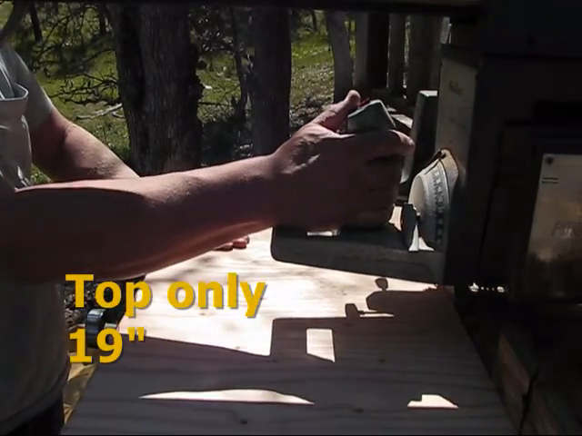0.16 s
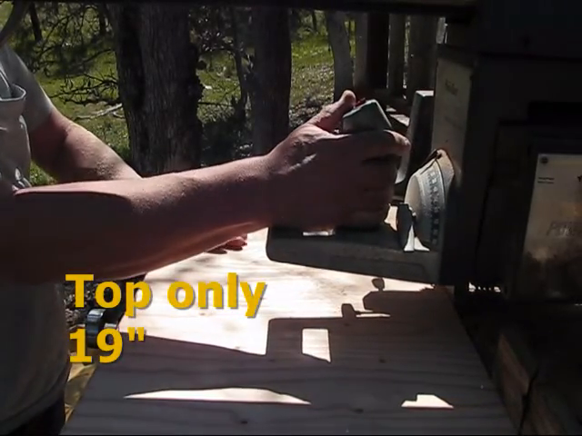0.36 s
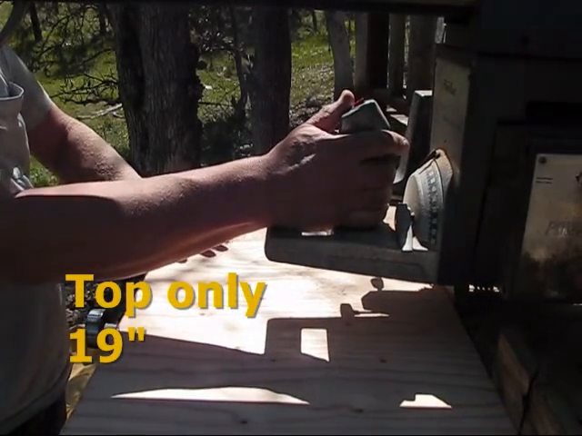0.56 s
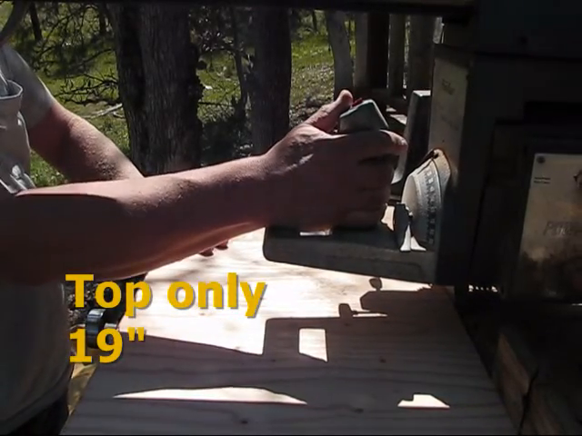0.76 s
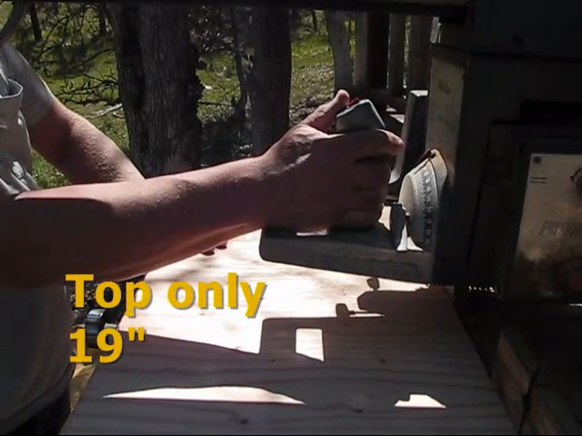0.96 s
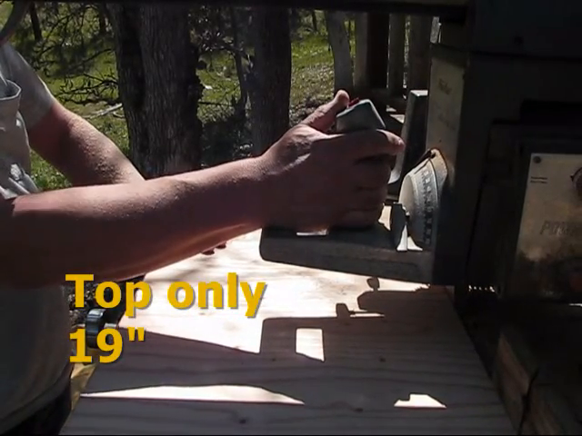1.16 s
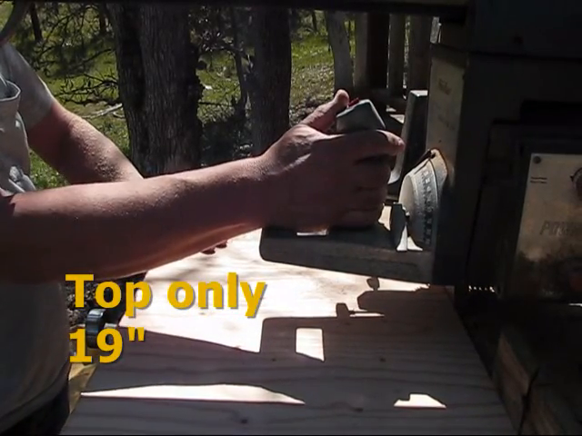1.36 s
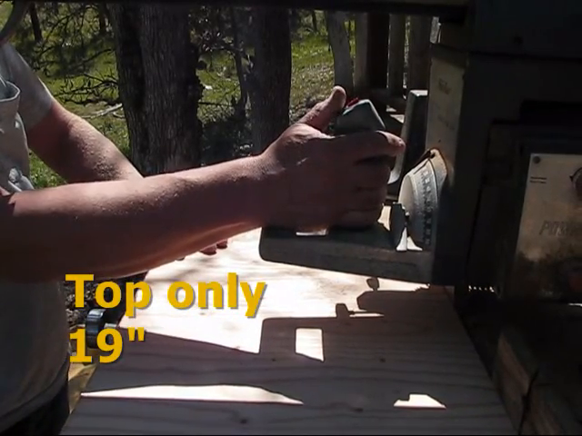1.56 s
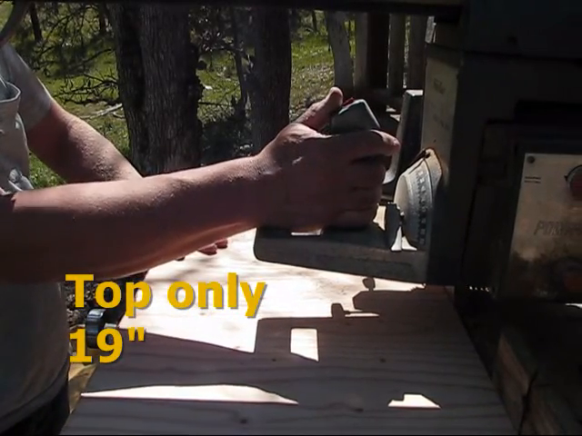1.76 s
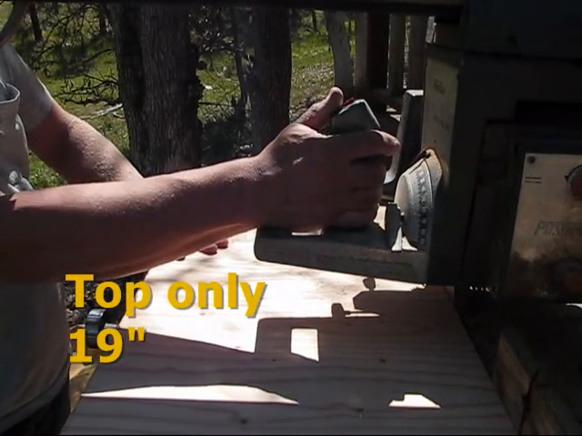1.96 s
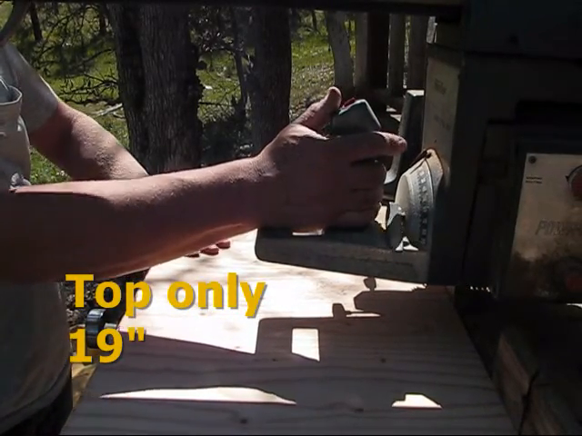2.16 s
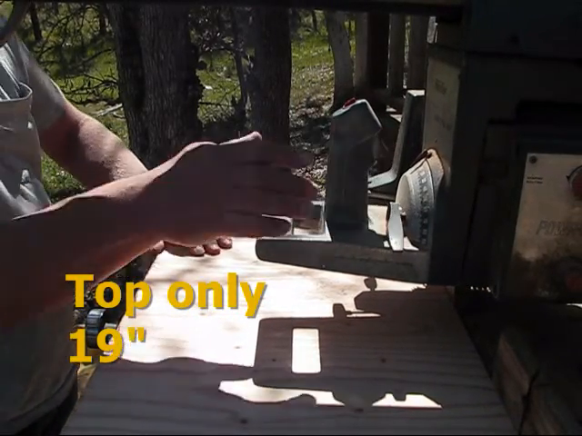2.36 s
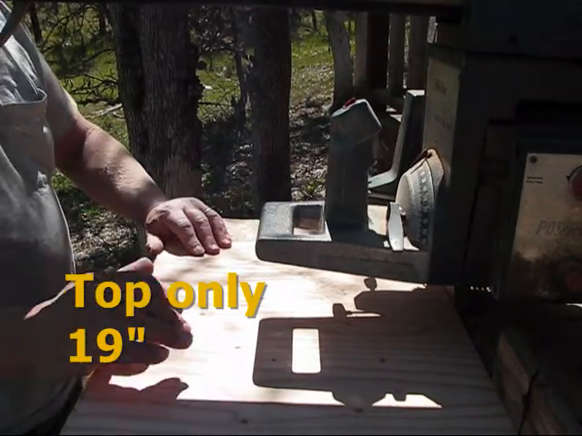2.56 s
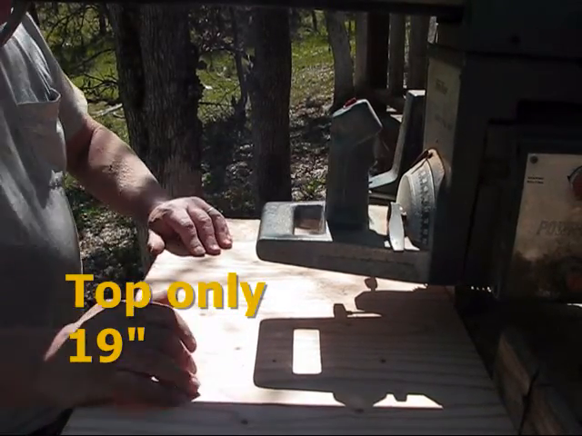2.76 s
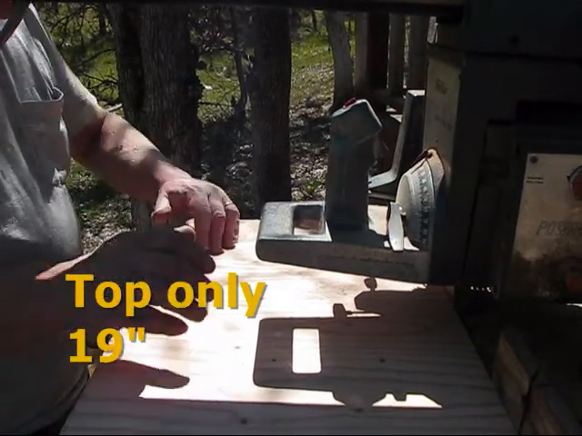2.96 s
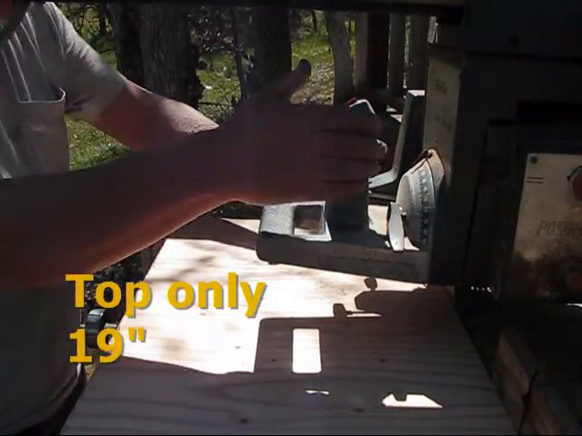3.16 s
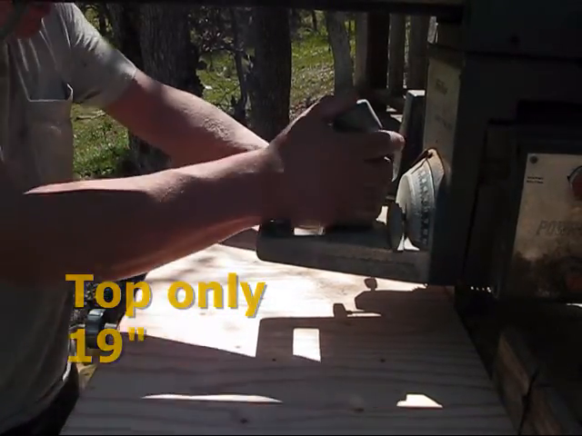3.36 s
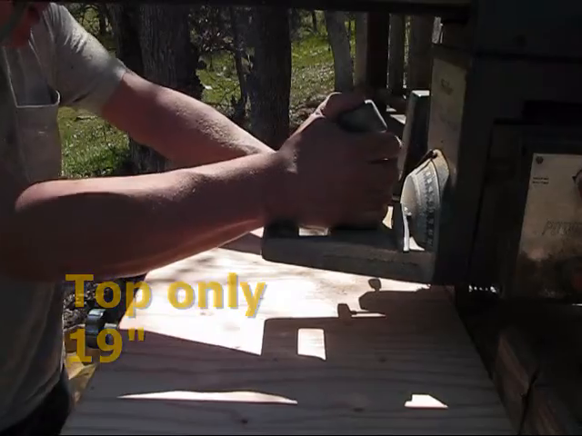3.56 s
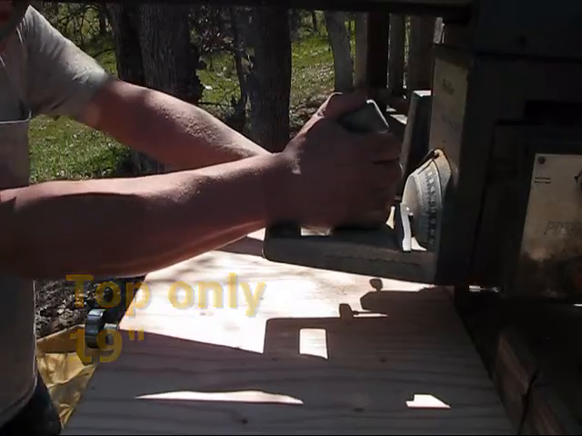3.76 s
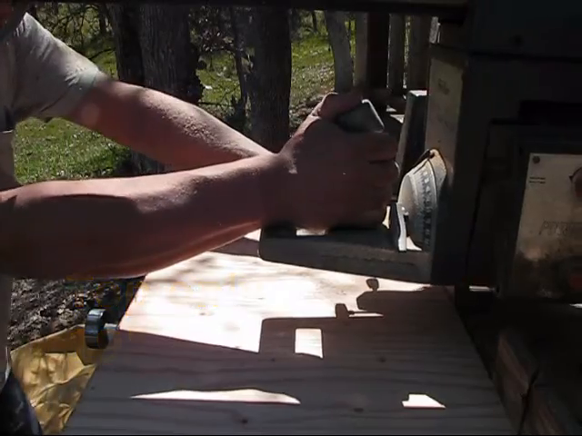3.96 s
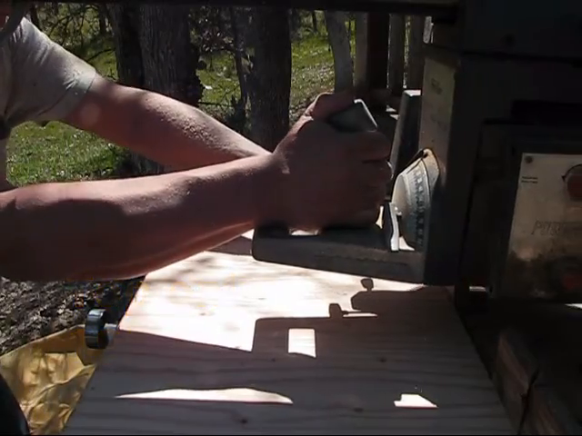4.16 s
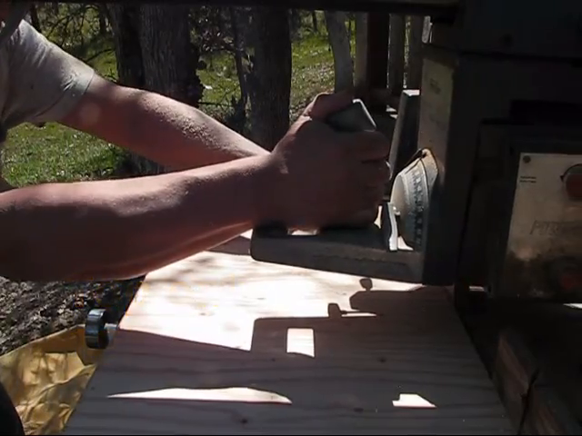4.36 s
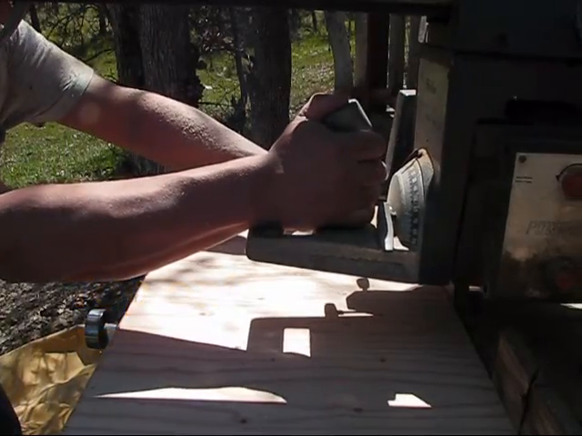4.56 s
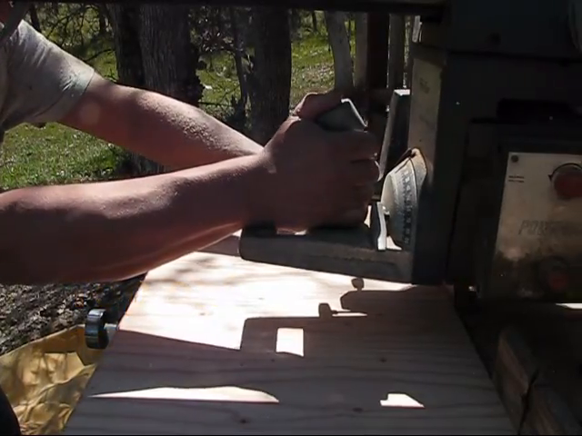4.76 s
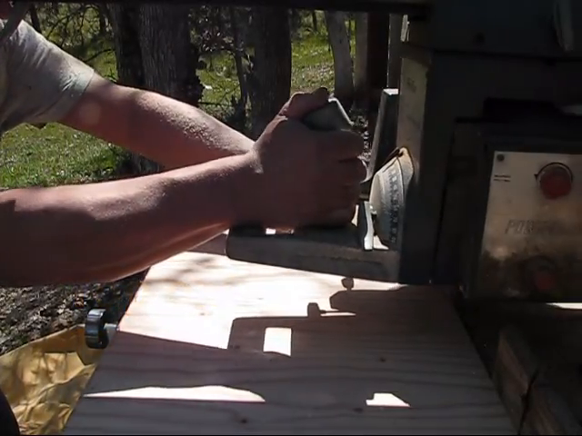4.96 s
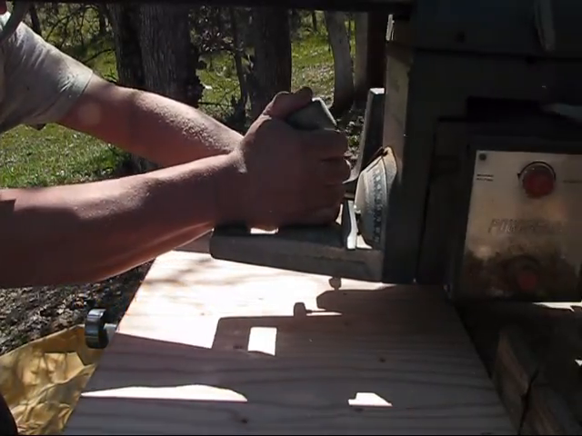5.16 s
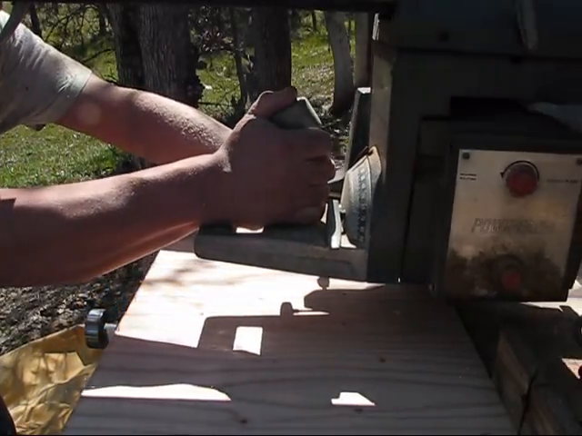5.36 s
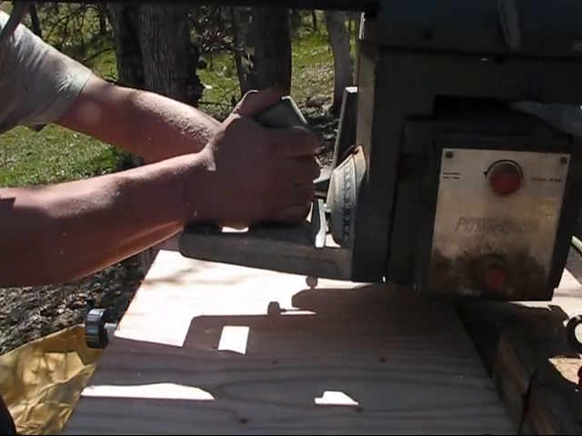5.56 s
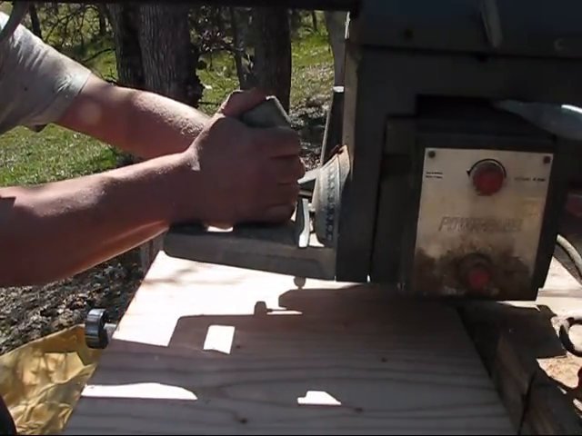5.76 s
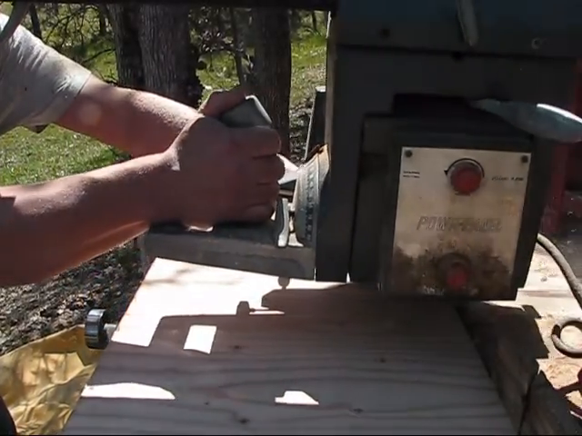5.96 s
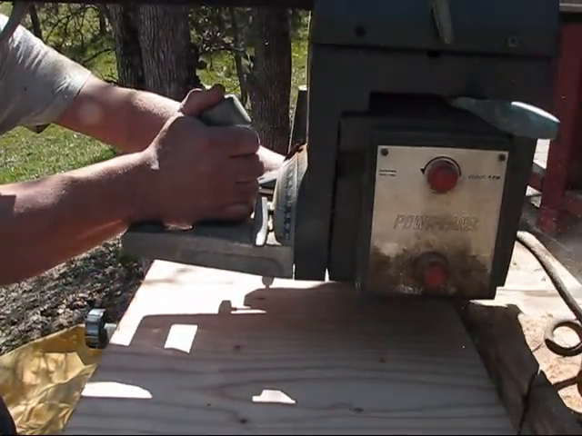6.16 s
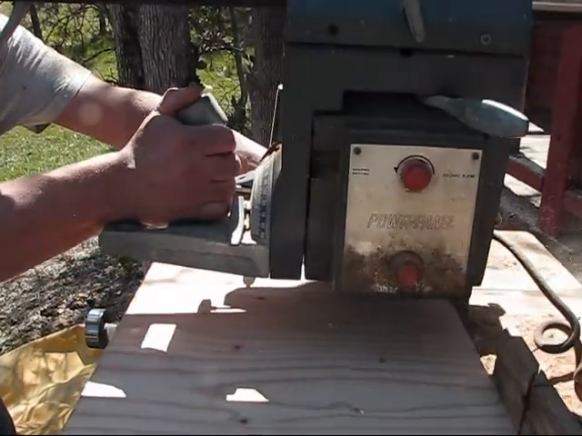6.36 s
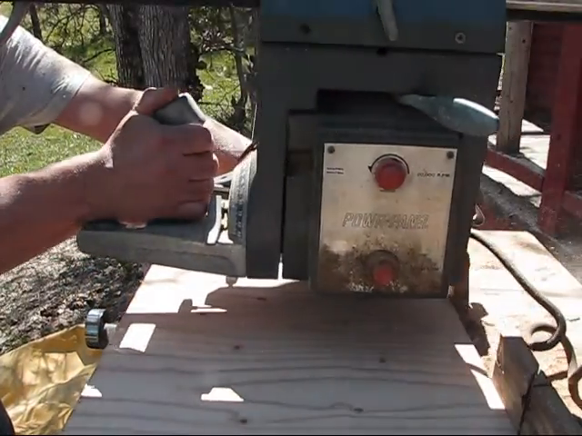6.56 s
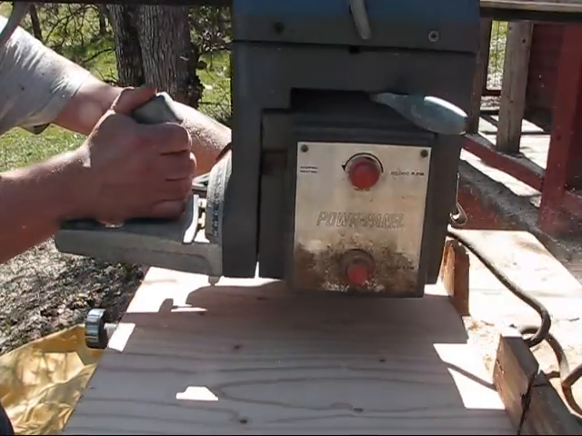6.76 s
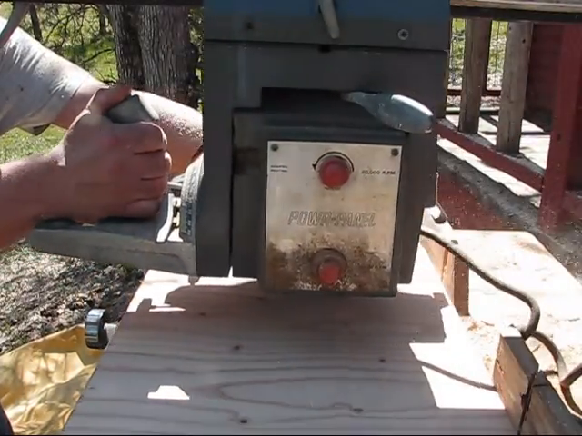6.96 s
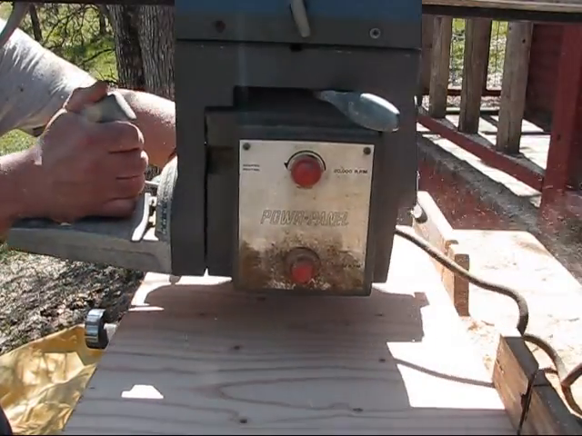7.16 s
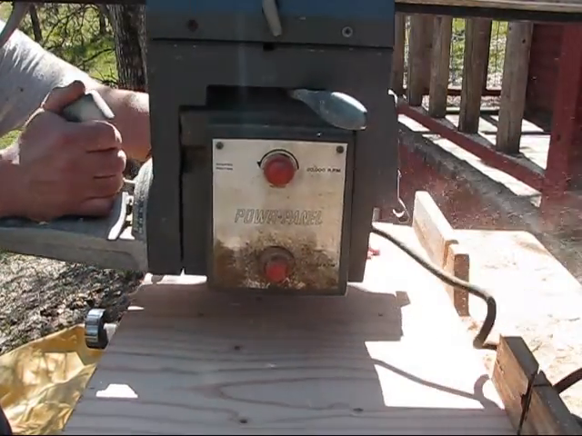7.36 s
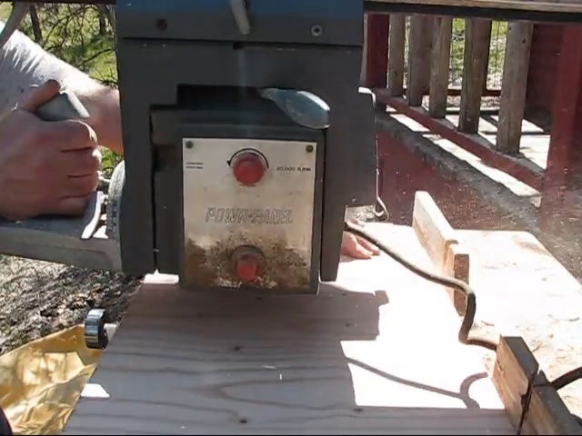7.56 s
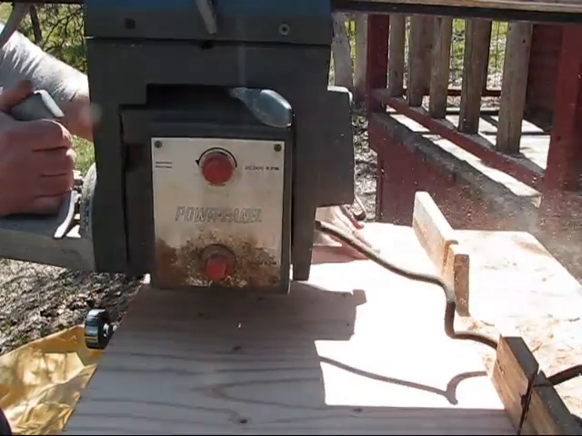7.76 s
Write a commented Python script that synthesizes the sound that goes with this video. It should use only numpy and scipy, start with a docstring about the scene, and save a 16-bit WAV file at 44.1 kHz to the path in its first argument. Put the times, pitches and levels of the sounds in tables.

```python
"""A radial arm saw on an outdoor deck spins up and is pulled through a board, slowing a little under load.
First the carriage rolls and squeaks, hands and board rub and knock on the table, and the switch snaps.
The motor then forces its housing and frame into vibration, and air rushes through the guard.
Twenty teeth chop the air into a harmonic series whose partials flare as they sweep through resonances;
the steel plate rings in its own modes, more strongly as it sinks into the wood."""
import sys
import numpy as np
from scipy import signal
from scipy.fft import rfft, irfft
from scipy.io import wavfile

SR = 44100
rng = np.random.default_rng(int(sys.argv[2]) if len(sys.argv) > 2 else 0)


def digitize_waveform(pressure):
    """Quantize a signal to 16-bit integers and store it at the path in sys.argv[1].

    Rows of a 2-D input are taken as channels; values are limited to [-1, 1].
    """
    field = np.atleast_2d(pressure).T
    bounded = np.clip(field, -1, 1)
    quanta = np.round(bounded * 32767).astype(np.int16)
    wavfile.write(sys.argv[1], SR, quanta)


N = 348390
T = np.arange(N) / SR
HZ = np.maximum(np.fft.rfftfreq(N, 1 / SR), 1)
SWITCH_ON_S = 3.8218
TEETH, FREE_TOOTH_HZ = 20, 942   # tooth count; tooth-passing frequency without load
PANEL_RADIATION = 1 / (1 + (500 / HZ) ** 2)   # small panels radiate little bass


def from_db(db):
    """Amplitude ratio of a level in decibels."""
    return 10 ** (np.asarray(db) / 20)


def unit_power(x):
    """Normalisation to a mean square of one."""
    return x / np.sqrt(np.mean(x ** 2) + 1e-20)


def over_time(points):
    """Linear interpolation of a curve at every sample."""
    return np.interp(T, *np.transpose(points))


def over_hz(points):
    """Interpolation on a logarithmic frequency axis."""
    hz, value = np.transpose(points)
    return np.interp(np.log(HZ), np.log(hz), value)


def colour(points):
    """Spectral envelope, falling 12 dB an octave below its lowest point."""
    return from_db(over_hz(points)) * np.minimum(HZ / points[0][0], 1) ** 2


def resonances(modes, at=HZ):
    """Frequency response of damped resonators, summed in power."""
    return np.sqrt(sum(from_db(db) ** 2 / (1 + ((at ** 2 - hz ** 2) / (at * width)) ** 2)
                       for hz, width, db in modes))


def swells(events):
    """Summed envelopes of exponential growth to a peak and exponential decay."""
    return sum(from_db(db) * np.exp(-np.maximum((peak - T) / swell, (T - peak) / decay).clip(max=40))
               for peak, db, swell, decay in events)


def burst(start_s, attack_s, hold_s, decay_s):
    """Envelope with a linear attack; exponential decay begins hold_s after the start."""
    age = T - start_s
    return np.clip(age / attack_s, 0, 1) * np.exp(-np.clip((age - hold_s) / decay_s, 0, 40))


def drift(rate_hz):
    """Random modulation: low-passed noise of unit spread."""
    step, settle = 40, 2000
    pole = np.exp(-2 * np.pi * rate_hz * step / SR)
    white = rng.standard_normal(N // step + settle + 2)
    slow = signal.lfilter([1], [1, -2 * pole, pole * pole], white)[settle:]
    return np.interp(np.arange(N) / step, np.arange(len(slow)), unit_power(slow))


def pan(left_db):
    """Channel gains for an interaural level difference."""
    return from_db(np.array([[left_db], [-left_db]]) / 2)


def tone(cycles, flutter_db, wobble_rad, apart_rad, rate_hz=22):
    """A unit-power partial: turbulence modulates level and phase, reflections set the sides apart."""
    phase = 2 * np.pi * cycles + wobble_rad * drift(rate_hz)
    level = unit_power(from_db(flutter_db * (drift(1.7) + drift(rate_hz)) / 2))
    spread = apart_rad * drift(0.66) * np.array([[1], [-1]])
    return np.sqrt(2) * level * np.sin(phase + spread)


# Likeness of the sound field at left and right: frequency_hz, correlation
COHERENCE = [(40, 0.26), (150, 0.47), (300, 0.74), (600, 0.92), (1200, 0.76), (2500, 0.69), (5000, 0.49),
             (9000, 0.15), (14000, 0.87)]
def noise(gain):
    """Partially coherent stereo noise of unit power, shaped by a gain per frequency."""
    mid, side = rfft(rng.standard_normal((2, N)))
    alike = over_hz(COHERENCE)
    spectrum = np.sqrt(1 + alike) * mid + np.sqrt(1 - alike) * side * [[1], [-1]]
    return unit_power(irfft(gain * spectrum, N))


# Spectrum of distant rustle: frequency_hz, gain_db
RUSTLE_SPECTRUM = [(76, -48), (130, -1.5), (427, -3), (565, -0.5), (651, 0), (994, 1), (1120, -1.5),
                   (1610, -5.5), (2610, -14.5), (7150, -19), (8070, -18), (15100, -24), (16000, -33)]
# Narrow bands of a faint hum: pitch_hz, width_hz, gain_db
HUM_BANDS = [(99.2, 2.6, -1.5), (286.7, 3, -9.5), (600, 2.9, -10), (7800, 30, -28)]
# Spectrum of low rumble: frequency_hz, gain_db
RUMBLE_SPECTRUM = [(12, -35), (20, -3), (96, -2), (124, -4), (154, 1), (182, -25), (200, -14), (260, -44),
                   (440, -120)]
# Soft bumps in the rumble: peak_s, level_db, swell_s, decay_s
LOW_BUMPS = [(.68, -52, 0.093, .12), (1.98, -46, .02, 0.028), (2.38, -45, 0.055, 0.04),
             (2.93, -43, 0.038, 0.038), (3.6, -53, 0.033, .25)]
def outdoors():
    """The ambient noise floor of rustle, hum and rumble, faded out as the saw starts."""
    rustle = from_db(-49.5) * noise(colour(RUSTLE_SPECTRUM))
    hum = from_db(np.interp(T, [1.6, 2.1], [-64, -56])) * noise(resonances(HUM_BANDS))
    rumble = (from_db(-60) + swells(LOW_BUMPS)) * noise(colour(RUMBLE_SPECTRUM) / (1 + (HZ / 160) ** 4))
    return (rustle + hum + rumble) * np.exp(-np.maximum(T - SWITCH_ON_S, 0) / 0.067)


# Runs of the carriage on its track: peak_s, level_db, swell_s, decay_s
CARRIAGE_RUNS = [(.12, -32.5, 1.4, 0.095), (.36, -48, 0.067, 0.078), (1.03, -46.5, 0.31, 0.15),
                 (1.86, -41.5, 0.085, 0.042), (3.71, -39, 0.069, 0.073)]
# Spectrum of the vibrating carriage: frequency_hz, gain_db
CARRIAGE_SPECTRUM = [(88, -57), (150, -25), (297, -13), (368, -6.5), (578, -7.5), (805, 0.5), (979, -0.5),
                     (1060, 2.5), (1290, -6), (1530, -0.5), (1940, -11), (2220, -9), (4000, -17.5),
                     (9440, -16.5), (16000, -30)]
# Strokes of hands and board over the table: start_s, length_s, level_db
SLIDE_STROKES = [(0, 0.16, -30.5), (0.187, 0.21, -44.5), (0.457, 0.68, -58), (0.896, 0.2, -52),
                 (1.736, 0.15, -47.5), (2.126, 0.15, -43), (2.322, 0.11, -43), (2.496, .04, -53.5),
                 (2.743, 0.087, -49), (2.882, .03, -49), (3.015, .14, -46.5), (3.295, 0.076, -42),
                 (3.42, .08, -40), (3.594, 0.16, -40.5)]
# Spectrum of friction on wood: frequency_hz, gain_db
FRICTION_SPECTRUM = [(710, -42), (1200, -5), (1460, 1), (2000, -4), (2380, -3.5), (2620, 0), (10000, -4.5),
                     (13000, -4.5), (16000, -36)]
# Light knocks and scuffs of the board: peak_s, level_db, swell_s, decay_s
BOARD_KNOCKS = [(.502, -47, 0.0081, .012), (.8, -45.5, 0.017, 0.021), (1.196, -32.5, 0.00072, 0.0027),
                (1.239, -36, .0009, 0.0036), (2.825, -41, 0.0079, 0.0069), (3.024, -35.5, 0.0058, 0.014),
                (3.055, -39, 0.0046, 0.01), (3.093, -34.5, 0.0035, 0.0056), (3.156, -29.5, 0.011, 0.0062),
                (3.365, -27.5, 0.0012, 0.01), (3.384, -45, .003, 0.0037), (3.44, -37, 0.018, 0.026),
                (3.696, -44, 0.0035, .01), (3.708, -23, 0.00062, 0.003)]
# Modes of the saw table: pitch_hz, width_hz, gain_db
TABLE_MODES = [(290, 60, 4), (900, 470, -17), (1450, 300, 4), (2400, 1100, 3.5), (4370, 2200, 8.5),
               (9600, 4200, 1)]
def handling(shake_db=-14):
    """Contact noise: the carriage rolls, wood rubs, and impacts excite both table and carriage."""
    blows = swells(BOARD_KNOCKS)
    strokes = sum(from_db(db) * burst(start, 0.021, length, 0.025) for start, length, db in SLIDE_STROKES)
    carriage_drive = from_db(5) * swells(CARRIAGE_RUNS) + from_db(shake_db) * blows
    roll = carriage_drive * noise(colour(CARRIAGE_SPECTRUM) / np.sqrt(1 + (HZ / 10000) ** 2))
    slide = strokes * from_db(-3.5 + 2.2 * drift(90)) * noise(colour(FRICTION_SPECTRUM))
    knocks = blows * noise(resonances(TABLE_MODES))
    return (roll + slide + knocks) * (T < SWITCH_ON_S) * pan(-2.1)


# Thin rings of small metal parts, and at 1.88 s a faint ring of the idle blade: start_s, pitch_hz, level_db,
# decay_s
METAL_SQUEAKS = [(1.0, 4264, -55, 0.13), (1.1, 2040, -46, 0.03), (1.88, 4300, -55, 0.16),
                 (1.88, 2830, -63, .14), (3.283, 1770, -43, 0.0081), (3.312, 2400, -43, 0.02),
                 (3.42, 1440, -38, 0.012)]
def squeaks():
    """Damped free vibration of parts of the carriage and its handle, and of the idle blade."""
    return sum(from_db(db) * burst(start, 0.0028, 0, decay)
               * tone(hz * T, flutter_db=2, wobble_rad=0.63, apart_rad=0.31)
               for start, hz, db, decay in METAL_SQUEAKS)


# Spectrum of the switch's snap: frequency_hz, gain_db
SNAP_SPECTRUM = [(120, -56), (200, -23), (1420, -5), (3620, -11.5), (4270, -1.5), (5840, -10), (7970, -3),
                 (11100, -13), (13600, -18), (16000, -27)]
def switch(trip_db=-13, contact_db=-5.5, travel_s=0.00075, hold_s=0.0038, decay_s=0.003):
    """A brief impact has a broad spectrum: the switch trips, then its contacts slam shut."""
    age = T - SWITCH_ON_S
    level = (age > 0) * from_db(np.where(age < travel_s, trip_db, contact_db))
    fading = np.exp(-np.clip((age - travel_s - hold_s) / decay_s, 0, 40))
    return level * fading * noise(colour(SNAP_SPECTRUM))


# Modes of the motor housing: pitch_hz, width_hz, gain_db
HOUSING_MODES = [(1040, 25, -2.5), (1309, 28, 0), (1576, 33, 0.5), (1940, 380, -6.5), (2460, 110, -10.5),
                 (2820, 59, 3), (3284, 330, -7), (4080, 78, -1.5), (5340, 150, -7.5)]
def housing_rattle(turns, strain, depth):
    """Forced vibration: the straining motor shakes its housing, pulsing with the mains and each turn."""
    level = from_db(-21.5 + 3.5 * strain + 4.5 * depth + 1.55 * drift(50)) * np.sqrt(strain)
    mains = np.sin(2 * np.pi * 120 * T)
    pulsing = 1 + 0.057 * mains + 0.11 * np.sin(2 * np.pi * turns)
    return level * pulsing * noise(resonances(HOUSING_MODES) * PANEL_RADIATION) * pan(-2.5)


# Spectrum of air driven by the motor: frequency_hz, gain_db
AIR_SPECTRUM = [(60, -28), (150, -15.5), (300, -7.5), (500, -5), (800, -0.5), (1200, 3), (2200, 0),
                (3200, 2), (5000, -4), (9000, -44), (16000, -35)]
# Resonances of the blade guard: pitch_hz, width_hz, gain_db
GUARD_MODES = [(630, 30, -28), (987.4, 8.9, 1.5), (1153, 14, -13), (1352, 2.2, -2)]
# Course of the guard's hollow howl: time_s, level_db
HOWL_LEVELS = [(3.85, -37), (4.8, -38), (5.2, -26.5), (5.6, -35), (5.85, -31.5), (6.9, -27), (7.33, -18),
               (7.55, -28.5), (7.9, -27)]
def airflow(strain, depth):
    """Turbulent air makes a broadband rush and excites the resonances of the guard."""
    rush = from_db(-27.5 - 5.2 * strain + 4.5 * depth) * noise(colour(AIR_SPECTRUM))
    howl = from_db(over_time(HOWL_LEVELS)) * noise(resonances(GUARD_MODES) * PANEL_RADIATION)
    return rush * pan(-1.1) + howl * pan(0.96)


# Modes in which the guard chatters: pitch_hz, width_hz, gain_db
CHATTER_MODES = [(2584, 58, -6), (2766, 45, 3.5)]
def guard_chatter(strain, depth):
    """Irregular forced vibration of the guard, growing with strain and depth of cut."""
    level = from_db(-34.5 + 2 * strain + 8.5 * depth + 4.5 * drift(39))
    return level * noise(resonances(CHATTER_MODES) * PANEL_RADIATION) * pan(-2.5)


# Modes of the saw's frame: pitch_hz, width_hz, gain_db
FRAME_MODES = [(126, 12, -11.5), (245, 23, -18), (359.5, 4.9, 4.5), (479, 21, 5.5), (696, 85, -2),
               (1017, 150, -1)]
def frame_shudder(hold_s=0.068, fall_db_per_s=72):
    """Transient response of the frame to the starting torque."""
    level = from_db(-23 - fall_db_per_s * np.maximum(T - SWITCH_ON_S - hold_s, 0))
    return level * noise(resonances(FRAME_MODES) * HZ / (HZ + 150)) * pan(-2.5)


# Resonance of the fan's cowl: pitch_hz, width_hz, gain_db
COWL_MODES = [(700, 140, -29.5)]
def cooling_fan(turns, speed, depth, vanes=18):
    """The vane-passing tone swells as it sweeps through the resonance of the cowl."""
    vane_hz = vanes / TEETH * FREE_TOOTH_HZ * speed
    level = resonances(COWL_MODES, vane_hz) * from_db(-9 * depth)
    return level * tone(vanes * turns, flutter_db=7, wobble_rad=0.73, apart_rad=0.29) * pan(0.9)


# Motor tones at free speed: shaft_multiple, level_db
SHAFT_HARMONICS = [(11, -48), (12, -52), (13, -40), (19, -43), (22, -45), (24, -62)]
def motor_whine(turns, speed):
    """Harmonics of the shaft's rotation, with amplitude rising as the fourth power of speed."""
    whine = sum(from_db(db) * tone(order * turns, flutter_db=-1.5, wobble_rad=0.22, apart_rad=0.62)
                for order, db in SHAFT_HARMONICS)
    return whine * speed ** 4 * pan(0.9)


def growl(turns, speed):
    """Deep phase modulation roughens the third tooth harmonic while the motor labours."""
    labour = np.clip(2.2 * (1 - speed), 0, 1) * speed ** 2
    rough = tone(3 * TEETH * turns, flutter_db=4, wobble_rad=3, apart_rad=0.4, rate_hz=110)
    return from_db(-25) * labour * rough


# Resonances of blade and guard: pitch_hz, width_hz, gain_db
FLARE_RESONANCES = [(930, 20, -25), (1805, 30, -31), (2775, 40, -24), (3490, 45, -25), (3730, 30, -24),
                    (4470, 70, -25), (5400, 40, -25), (6095, 50, -24), (6320, 50, -25), (6465, 60, -19),
                    (7320, 40, -18), (8690, 60, -24), (9140, 30, -27), (9285, 25, -24), (9930, 170, -25),
                    (10630, 110, -26), (11190, 70, -22), (11740, 160, -23), (12110, 30, -26),
                    (13000, 110, -19), (13340, 120, -30)]
# Low overtones of the tooth note: harmonic_number, gain_db
LOW_HARMONICS = [(2, 1.5), (3, -9), (4, 1), (5, 6.5), (6, 6.5), (7, -0.5), (8, 1)]
# High whistling overtones: harmonic_number, gain_db
HIGH_HARMONICS = [(9, -1), (10, 4), (11, -1), (12, 3), (13, 1), (14, -5), (15, 4), (16, -5), (17, -4)]
def teeth(turns, speed, depth, whistling, unevenness=0.11):
    """The siren principle: teeth chop the air into harmonics, each flaring as it crosses a resonance."""
    response = resonances(FLARE_RESONANCES)
    tooth_hz = FREE_TOOTH_HZ * speed
    fundamental = tone(TEETH * turns, flutter_db=1.7, wobble_rad=0.033, apart_rad=0.21)
    out = np.interp(tooth_hz, HZ, response) * fundamental * pan(2.3)
    # The wood drives the low overtones harder and damps the high whistles.
    low = LOW_HARMONICS, from_db(-43 + 9 * depth), from_db(-2 - 1.5 * depth), -0.7
    high = HIGH_HARMONICS, from_db(-38 - 11 * depth) * whistling, from_db(4 - 9 * depth), -2.5
    for harmonics, steady, flaring, left_db in (low, high):
        for k, db in harmonics:
            # Unequal teeth make each overtone throb once a turn.
            throb = 1 + unevenness * np.sin(2 * np.pi * (turns + rng.random()))
            partial = tone(k * TEETH * turns, flutter_db=3.5, wobble_rad=0.05 * k,
                           apart_rad=0.45, rate_hz=45)
            fading = unit_power(from_db(5 * drift(9)))
            flare = flaring * np.interp(k * tooth_hz, HZ, response) * from_db(-18 * (1 - whistling))
            level = from_db(db) * np.hypot(steady * fading, flare) * speed ** 2
            out += level * throb * partial * pan(left_db)
    return out


# Spectrum of the rasping teeth: frequency_hz, gain_db
RASP_SPECTRUM = [(1000, -47), (2200, 5.5), (3200, -4), (4500, 5.5), (6800, 9), (8000, 1.5), (12000, -5.5),
                 (16000, -18)]
# Spectrum of air leaving the rim: frequency_hz, gain_db
HISS_SPECTRUM = [(3000, -12.5), (6500, -13), (8500, 2.5), (11000, 2.5), (13000, 2.5), (14500, -7.5),
                 (16000, -4.5)]
def rim_noise(turns, speed, depth, whistling, bite):
    """Amplitude-modulated noise: rasp and hiss pulse with each tooth, the rasp also with each turn."""
    runout = 1 + 0.32 * np.sin(2 * np.pi * turns)
    rasp = from_db(-27 + 7 * speed ** 6 + 0.4 * depth + drift(21)) * noise(colour(RASP_SPECTRUM))
    hiss = from_db(-28 + 8.5 * whistling - depth + 1.1 * drift(33)) * noise(colour(HISS_SPECTRUM))
    return bite * (runout * rasp * pan(-2.5) + hiss * pan(-4))


# Modes of the steel plate: pitch_hz, gain_db
PLATE_MODES = [(3079, -38), (3198, -34), (3736, -31), (3838, -31), (4107, -38), (4468, -30), (4587, -30),
               (4888, -35), (5082, -36), (5340, -37), (5399, -36), (5792, -39), (5954, -39), (6455, -35),
               (6648, -36), (6810, -39), (7020, -38), (7316, -36), (7698, -43), (8048, -42), (8253, -43),
               (8376, -43)]
# Moments when one mode sings out in the wood: peak_s, level_db, swell_s, decay_s
SINGING_SWELLS = [(5.76, -16.5, 0.086, 0.054), (6.39, -18, 0.033, 0.025), (6.6, -13, .06, 0.19),
                  (7.05, -27, 0.056, .5)]
def plate_ring(depth, whistling, quality=400, singing_hz=4590):
    """Natural modes of the blade share one quality factor and keep their pitch at any speed."""
    modes = [(hz, hz / quality, db) for hz, db in PLATE_MODES]
    response = resonances(modes) / (1 + (2000 / HZ) ** 4)
    ring = from_db(-38 + 8 * whistling + 15 * depth + 1.3 * drift(4.7)) * noise(response)
    singing = tone(singing_hz * T, flutter_db=4, wobble_rad=1.1, apart_rad=0.5, rate_hz=20)
    return (ring + swells(SINGING_SWELLS) * singing) * pan(0.21)


# Course of the teeth's bite into the board: time_s, level_db
CUT_LEVELS = [(5.8, -44), (6.4, -25), (6.65, -19.5), (7.0, -29), (7.4, -25), (7.55, -21), (7.9, -16)]
# Resonances of the cut: pitch_hz, width_hz, gain_db
KERF_MODES = [(1064, 82, -5.5), (3206, 12, 10), (3380, 140, -6), (3580, 130, -6), (4230, 170, -24),
              (4980, 62, 0.5)]
def wood_cut(bite):
    """Noise pulsing at the tooth-passing frequency excites the resonances of the cut."""
    level = from_db(over_time(CUT_LEVELS) + 0.3 * drift(30))
    return level * bite * noise(resonances(KERF_MODES)) * pan(0.21)


# Slowing of the blade by drag: time_s, tooth_rate_lost_hz
DRAG_LOSS = [(5, 0), (5.35, 5), (5.9, 0), (6.27, 8), (6.55, 30), (7, 35.5), (7.3, 49), (7.6, 64),
             (7.9, 101)]
def saw(spin_up_s=0.368, spin_up_shape=0.874, entry_s=4.4, sunk_s=6.44, whistle_speed=0.866):
    """One rotation drives the saw's sounds: it nears free speed exponentially, then drag slows it."""
    age = np.maximum(T - SWITCH_ON_S, 1 / SR)
    tooth_hz = FREE_TOOTH_HZ * (1 - np.exp(-(age / spin_up_s) ** spin_up_shape)) - over_time(DRAG_LOSS)
    turns = np.cumsum(tooth_hz) / SR / TEETH
    speed = tooth_hz / FREE_TOOTH_HZ
    strain = np.clip(2.5 * (1 - speed), 0.03, 1)
    depth = np.interp(T, [entry_s, sunk_s], [0, 1])   # how far the blade is in the wood
    whistling = (1 + np.tanh((speed - whistle_speed) / 0.0182)) / 2   # soft threshold of the rim's whistle
    bite = 1 + 0.22 * np.sin(2 * np.pi * TEETH * turns)
    body = housing_rattle(turns, strain, depth) + airflow(strain, depth) + guard_chatter(strain, depth)
    body += frame_shudder()
    motor = cooling_fan(turns, speed, depth) + motor_whine(turns, speed) + growl(turns, speed)
    blade = teeth(turns, speed, depth, whistling) + rim_noise(turns, speed, depth, whistling, bite)
    blade += plate_ring(depth, whistling) + wood_cut(bite)
    running = np.clip((T - SWITCH_ON_S) / 0.021, 0, 1)
    return running * (body + motor + blade)


def scene(left_lag_s=1.3e-5):
    """Superposition of all sources, arriving slightly later on the left."""
    left, right = outdoors() + handling() + squeaks() + switch() + saw()
    delay = np.exp(-2j * np.pi * HZ * left_lag_s)
    return np.array([irfft(rfft(left) * delay, N), right])


def record(dry, ceiling=1.5, low_hz=28, high_hz=15900):
    """Soft saturation rounds the peaks; band limiting removes the deepest bass and the top."""
    rounded = ceiling * np.tanh(dry / ceiling)
    highpass = signal.butter(2, low_hz, "high", fs=SR, output="sos")
    lowpass = signal.ellip(10, 0.2, 80, high_hz, fs=SR, output="sos")
    return signal.sosfilt(lowpass, signal.sosfilt(highpass, rounded))


dry = scene()
out = record(dry)
digitize_waveform(out)
```